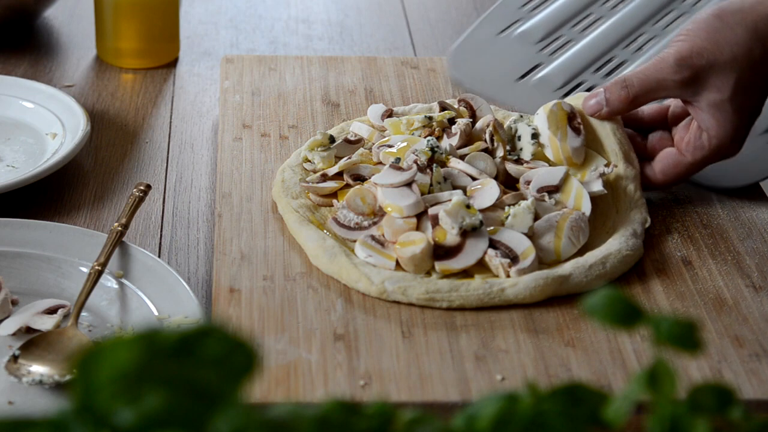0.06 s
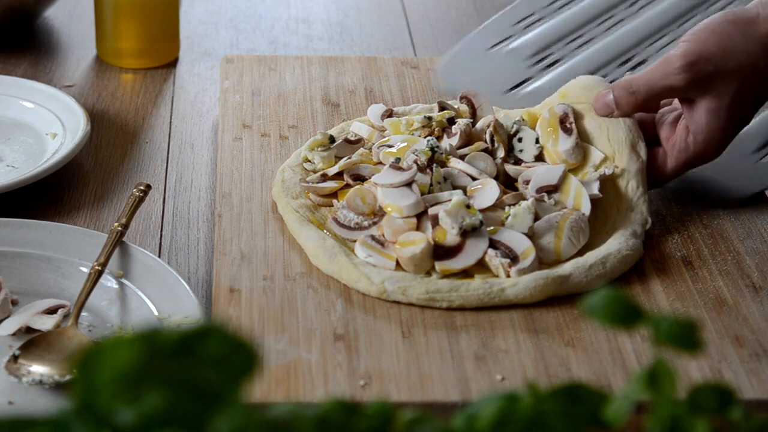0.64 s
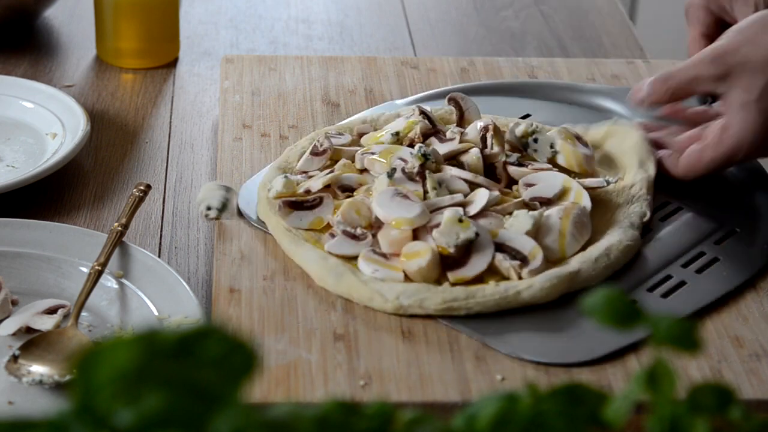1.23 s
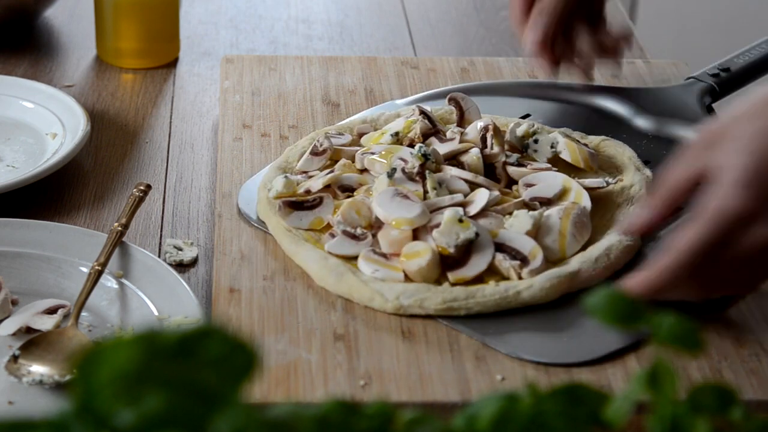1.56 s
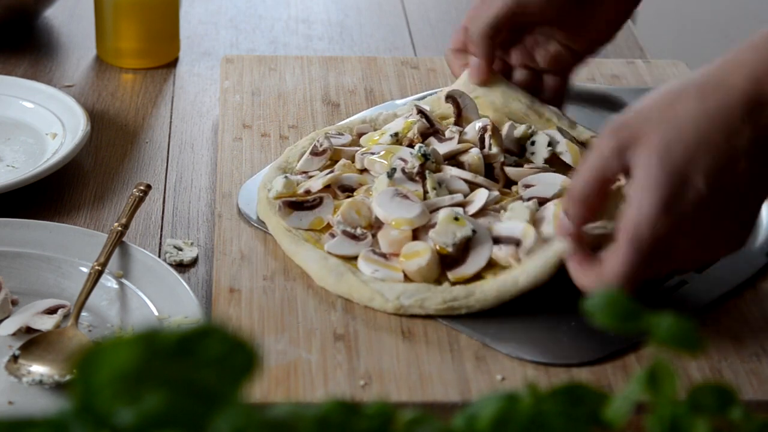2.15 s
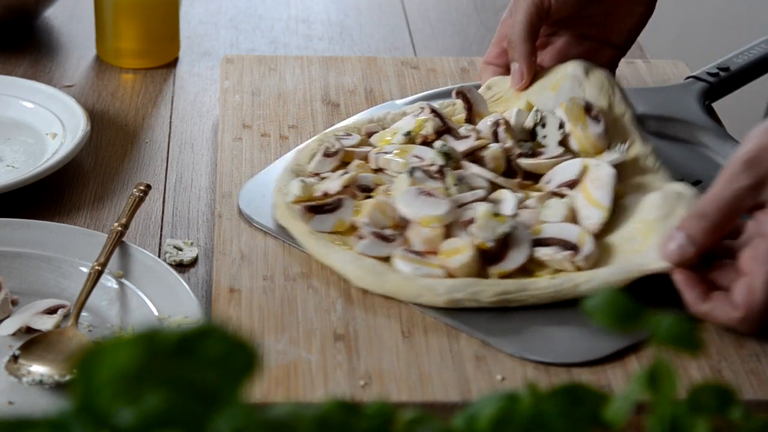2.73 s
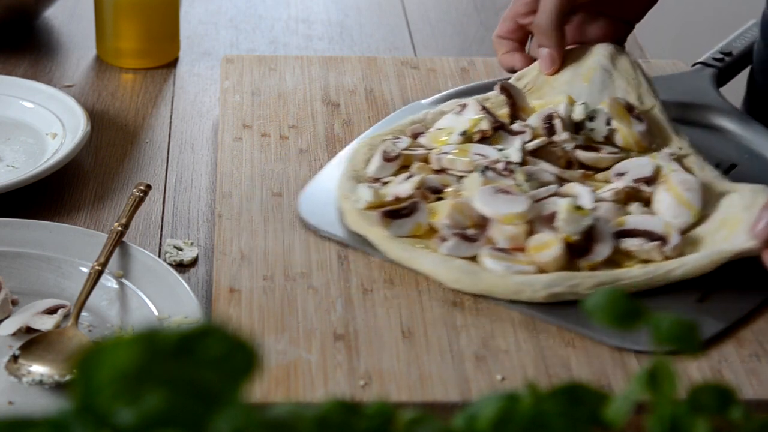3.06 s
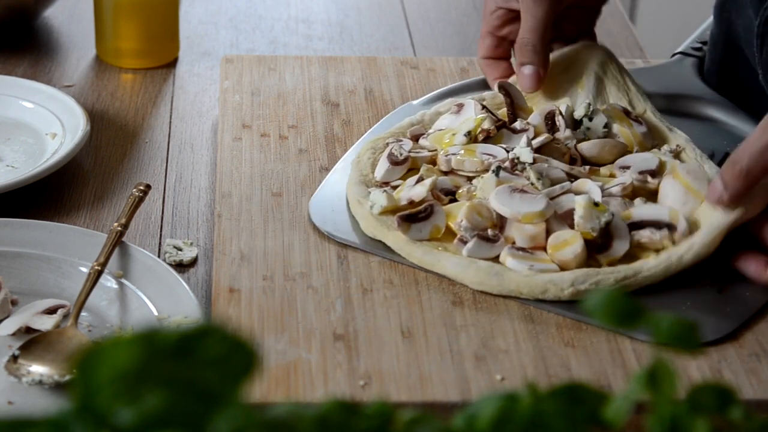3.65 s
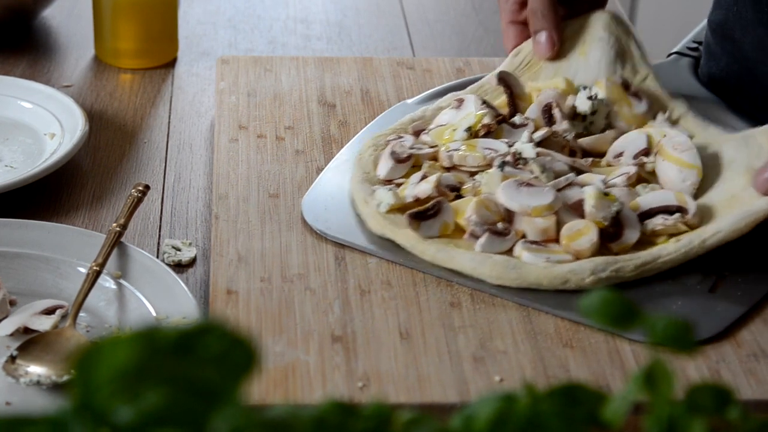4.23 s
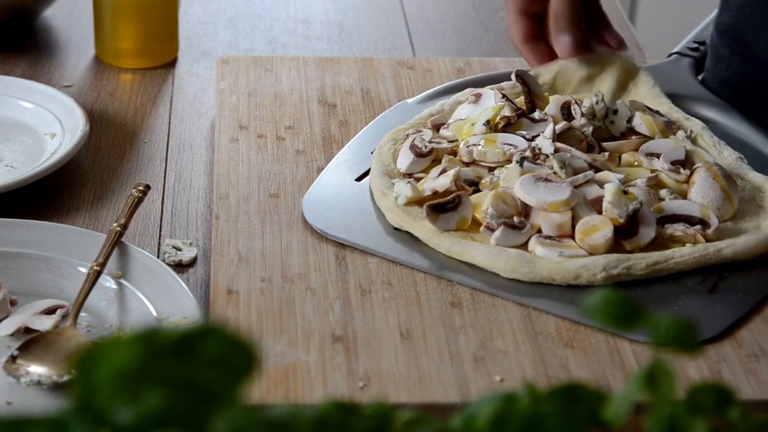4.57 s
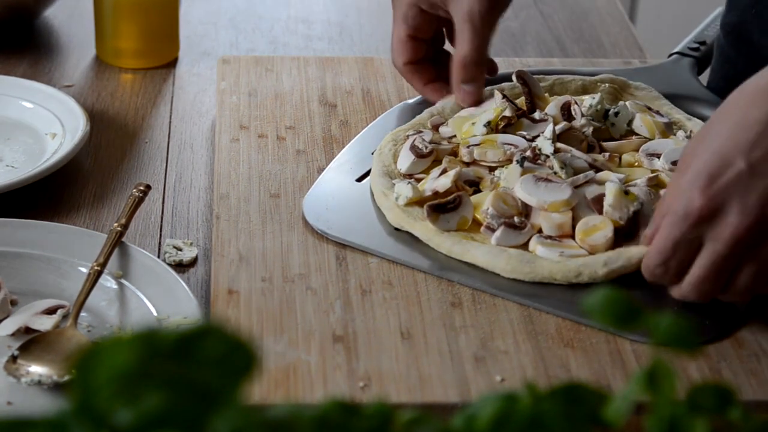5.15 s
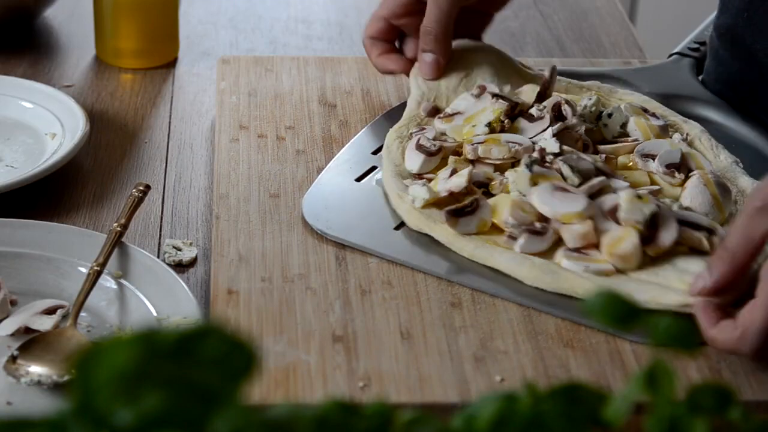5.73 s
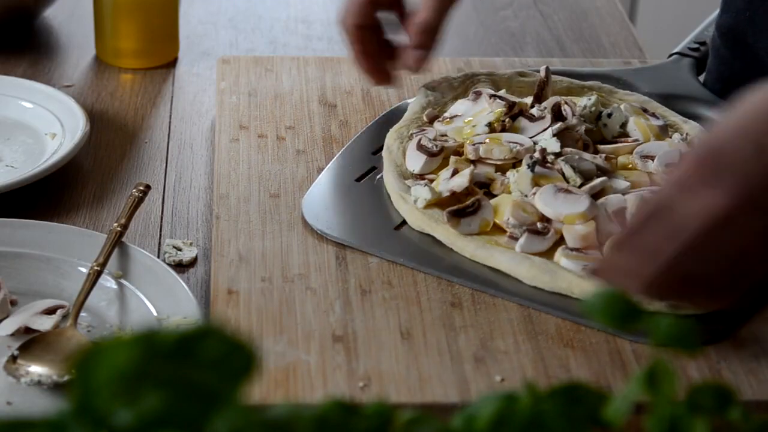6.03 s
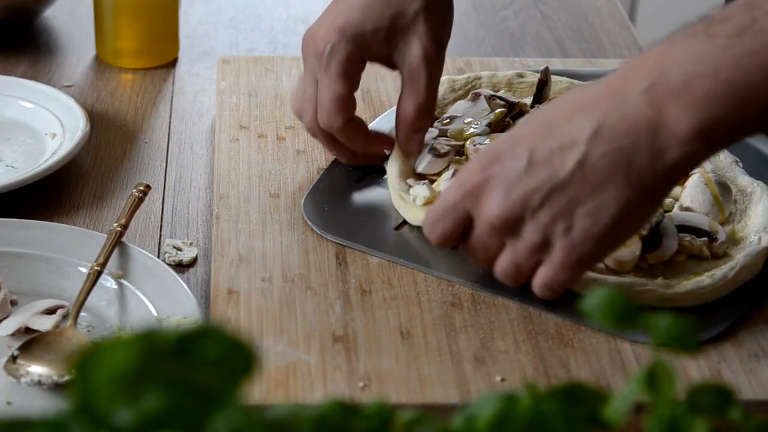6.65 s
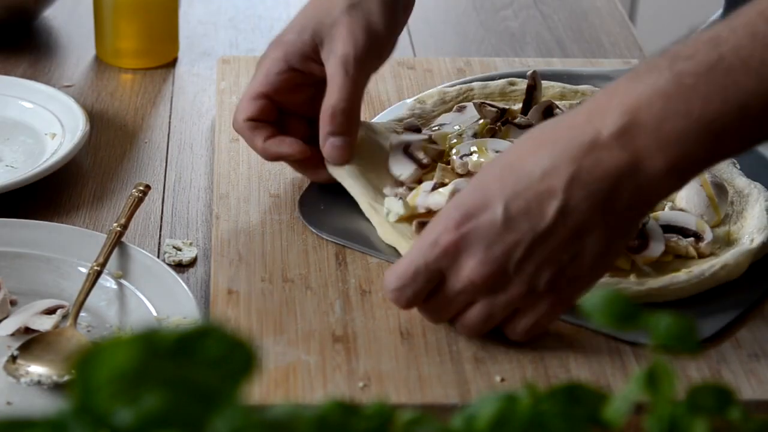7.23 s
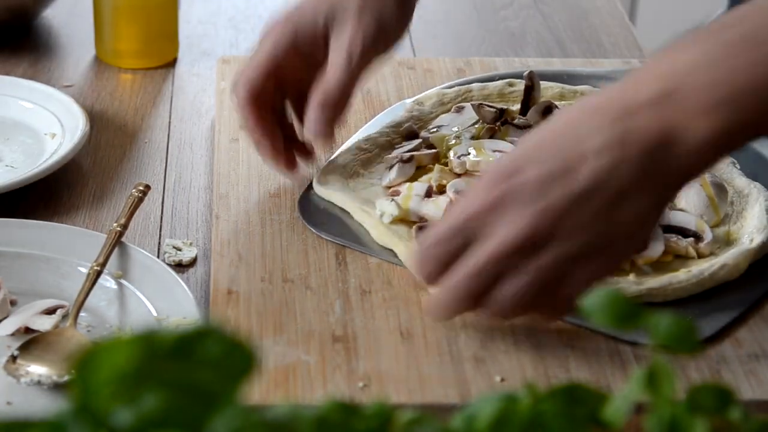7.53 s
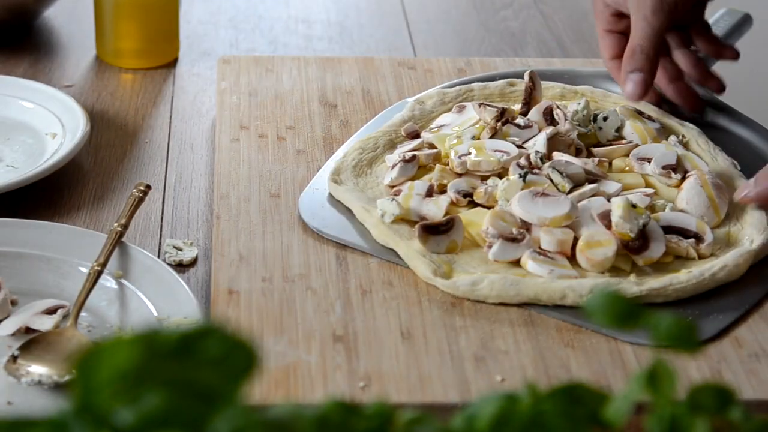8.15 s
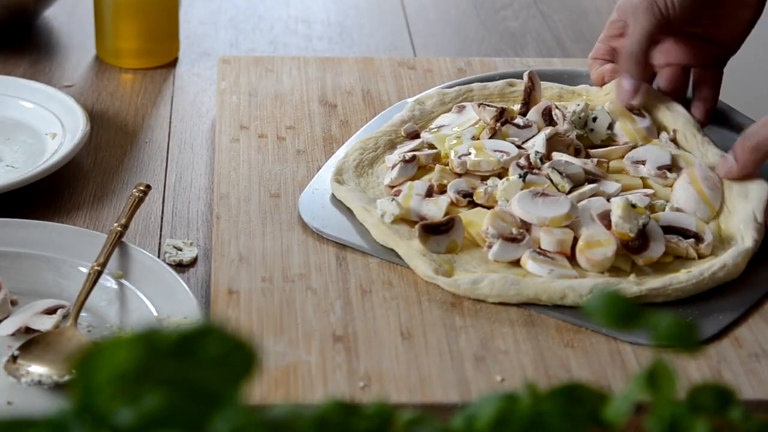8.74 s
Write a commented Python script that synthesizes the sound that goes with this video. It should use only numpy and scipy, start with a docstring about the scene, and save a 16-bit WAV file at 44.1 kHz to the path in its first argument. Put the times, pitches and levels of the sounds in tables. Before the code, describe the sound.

A metal pizza peel rasps over a wooden board in several short pushes. At about 0.9 seconds comes a louder, brighter shove that rings and falls in pitch as it slows. At 1.2 seconds the peel drops flat with a low thud and a clack, the strongest impact. Faint sticky ticks and soft finger bumps follow. From about 2.8 to 3.6 seconds dough drags on the metal with a soft floury hiss, a faint hollow note and several dull thumps. At 4 seconds there is a firm knock with a clatter and a short scuff. The rest is quieter: light clacks and rubs around 4.6, soft thumps near 5.1, 6.7 and 7.5, a brief rub at 7.1, small metallic clacks at 8 and soft bumps around 8.7 seconds. Everything is close and almost mono, in a small, quiet kitchen with a faint steady hiss.

```python
"""Pizza peel on a wooden board

A perforated metal peel scrapes over the board in short pushes, is shoved under the dough and drops flat.
Hands tug the pizza into shape: dough drags on the metal and ticks, the peel clacks on the board,
fingers thump the table softly. Small, quiet kitchen; close, almost mono."""
import sys
import numpy as np
from scipy import signal
from scipy.fft import rfft, irfft, next_fast_len
from scipy.io import wavfile
from scipy.ndimage import uniform_filter1d

SR = 44100
rng = np.random.default_rng(int(sys.argv[2]) if len(sys.argv) > 2 else 0)


def dump_mix(stems):
    """Bounce the given channels to the path in sys.argv[1] as a 16-bit WAV at rate SR."""
    frames = np.atleast_2d(stems).T  # one column per channel
    limited = np.clip(frames, -1, 1)  # hard clip at full scale
    pcm = np.round(limited * 32767).astype(np.int16)
    wavfile.write(sys.argv[1], SR, pcm)


N = 396459
TIME = np.arange(N) / SR

# low modes of board and table: (frequency [Hz], t60 [s])
BOARD_MODES = [(124, 0.1), (211, 0.072), (338, 0.15)]


def scrape(tremble, rise_s=.025, glide_s=.04, glide_db=-35.5, bite_s=.008, sing_share=.33):
    """The peel's edge grates over wood in short pushes, then bites and sings in one shove."""
    # metal on wood: (frequency [Hz], density [dB])
    rasp_spectrum = [(180, -38.5), (300, -0.5), (342, -2), (517, -11.5), (581, -1), (808, -7.5),
                     (985, -6.5), (1090, -2), (1460, -6), (1940, -3), (2170, -7), (2560, -3.5),
                     (5950, -18.5), (7250, -17.5), (15500, -32.5)]
    # pushes under the dough: (time [s], hold [s], level [dB])
    pushes = [(-.02, 0.01, -31.5), (.04, .01, -37), (0.166, 0.047, -23), (.218, 0.0041, -28),
              (0.363, .035, -35), (.492, .045, -27.5), (.555, .03, -24.5), (.686, 0.078, -22),
              (.74, .09, -22)]
    # shove, narrowing as it slows: (time [s], level [dB], treble [dB], centre [Hz], narrowness [0-1])
    shove_curve = [(.872, -22, -7, 2450, .2), (.892, -12, -6, 2610, .35), (.925, -12.5, -7, 2485, .35),
                   (.96, -14.5, -11.5, 1500, .45), (.985, -15.5, -16.5, 1348, .8),
                   (1.039, -23.5, -16, 1500, 0.6), (1.15, -32.5, -31.5, 1550, .85)]
    force = peel(friction(slips_per_s=4500, spread_db=1.7, smooth=.8), ring=3, t60_s=.3)
    rasp = unit(cut(colour(force, rasp_spectrum), 480, "high", order=4))
    edge = colour(friction(slips_per_s=4000, spread_db=-.5, smooth=.48), rasp_spectrum)
    edge = unit(cut(edge, 4800, "high", order=3))

    moves = [(s, rise_s, hold_s, db) for s, hold_s, db in pushes]
    # light glide before each push catches
    moves += [(s - glide_s, rise_s, glide_s + hold_s, glide_db) for s, hold_s, _ in pushes]
    push = strokes(moves, fade_db_per_s=140.5)  # the sheet rings on
    motion = strokes(moves, fade_db_per_s=300.5)  # edge fizz stops with the motion
    sliding = push * cut(rasp, 4800, "low", order=3) + amp(-20) * motion ** .65 * edge
    sliding += amp(-24) * push ** .45 * tremble
    sliding = cut(sliding, 11800, "low", order=5)  # highest fizz rolled off above about 12 kHz

    times_s, *columns = np.transpose(shove_curve)
    shove_db, treble_db, centre_hz, narrow = [np.interp(TIME, times_s, c) for c in columns]
    bite = np.clip((TIME - times_s[0]) / bite_s + 1, 0, 1)
    shove = bite * amp(shove_db - 126.5 * np.maximum(TIME - times_s[-1], 0))
    broad, sharp = [unit(resonate(force, centre_hz, width_hz)) for width_hz in (2000, 800)]
    sing = unit(cut((1 - narrow) * broad + narrow * sharp, 690, "high", order=4))
    brightness = amp(treble_db + 6)
    mids = cut(cut(rasp, 650, "high"), 1900, "low")
    grate = mids * brightness ** -.25 - cut(rasp, 2300, "high") * brightness ** .5
    fizz = amp(treble_db - 5) * unit(cut(rasp, 6600, "high", order=4))
    return sliding + shove * (np.sqrt(1 - sing_share) * grate + np.sqrt(sing_share) * sing + fizz)


def thumps(soft_rise_s=.022, hard_db=-8.5, sway_hz=72, rock_hz=28):
    """Soft blows swell the board's modes with a dull pat; the table sways, rocks and rumbles."""
    # fingertips favour the high mode, dough the low: (time [s], level [dB], high minus low [dB])
    blows = [(0.446, -31, -23), (0.991, -26.5, 25), (1.165, -9.5, -9), (1.201, -21.5, -6), (1.334, -34, -4),
             (1.4, -45.5, 1), (1.522, -48, 3), (1.652, -37, 11), (1.682, -34, -9), (1.754, -48, 12),
             (2.06, -51, -6.5), (2.188, -44.5, 14), (2.255, -34.5, 5), (2.82, -38, 8.5), (2.869, -43, -8),
             (2.967, -24.5, -16), (3.184, -25, -6.5), (3.231, -23.5, -20), (3.339, -20, -8.5),
             (3.563, -21.5, -15.5), (3.821, -44, 11), (3.899, -41.5, -18), (3.996, -16.5, 8.5),
             (4.07, -33.5, 0), (4.149, -44, 6), (4.497, -39, -4), (4.53, -35, -13), (4.666, -37, -12.5),
             (4.745, -37, -19), (4.955, -39, 1.5), (5.029, -40, 10), (5.138, -26.5, 1.5), (5.292, -48, 15),
             (5.401, -43, 11), (5.851, -40, 13), (5.996, -40.5, 19), (6.038, -43, 6), (6.288, -34, 8),
             (6.335, -44, 1.5), (6.49, -53, 8), (6.547, -36, -5.5), (6.657, -30, 7), (6.816, -48.5, 12),
             (6.926, -46.5, 12), (7.182, -45.5, -7), (7.521, -26.5, 6.5), (7.611, -42.5, -4),
             (7.78, -59, 6), (7.971, -37, 15), (8.04, -38.5, -4), (8.104, -40.5, -5), (8.408, -36.5, 24),
             (8.53, -52.5, -3), (8.679, -28.5, 32), (8.777, -27.5, -29), (8.948, -40, -9)]
    out, t = np.zeros(N), np.arange(SR // 2) / SR
    for s, level_db, tilt_db in blows:
        rise_s = soft_rise_s / (1 + amp(level_db - hard_db))  # harder lands faster
        swell = np.sin(np.pi / 2 * np.minimum(t / rise_s, 1)) ** 2
        after_s = np.maximum(t - rise_s, 0)
        low_db, high_db = level_db - max(tilt_db, 0), level_db + min(tilt_db, 0)
        mean_db = (low_db + high_db) / 2
        middle_db = mean_db + 3 + .31 * (mean_db - hard_db)
        modes = np.zeros(len(t))
        for (hz, t60_s), db in zip(BOARD_MODES, (low_db, middle_db, high_db)):
            detuned_hz = hz * (1 + .015 * rng.standard_normal())
            modes += amp(db) * decay(after_s, t60_s) * np.sin(2 * np.pi * detuned_hz * t)
        sway = amp(low_db - 10) * decay(after_s, .11) * np.sin(2 * np.pi * sway_hz * t)
        rock = amp(level_db - 24) * decay(after_s, .14) * np.sin(2 * np.pi * rock_hz * t)
        rumble = unit(cut(rng.standard_normal(len(t)), 190, "low", order=3))
        rumble *= amp(low_db - 17) * decay(after_s, .58)
        pat = unit(cut(rng.standard_normal(len(t)), 520, "low", order=3))
        pat *= amp(high_db - 23) * decay(after_s, .25)
        add(out, s, swell * (modes + sway + rock + rumble + pat))
    return out


def clacks():
    """Metal hits wood; the less dough damps the sheet, the more it rattles and rings."""
    # contacts: (time [s], level [dB], low edge [Hz], high edge [Hz], freedom to ring [dB])
    contacts = [(1.164, -14.5, 600, 1750, -12), (1.184, -20.5, 100, 910, 0.5), (1.36, -42, 1260, 3180, -1),
                (1.387, -54, 1400, 3800, -6), (1.527, -54, 300, 900, -7), (3.402, -50.5, 1200, 3320, -4),
                (3.807, -46.5, 2107, 3106, 11.5), (3.997, -31.5, 393, 1940, -12),
                (4.021, -30.5, 400, 2400, -7), (4.0573, -26, 880, 1730, -22),
                (4.502, -40.5, 450, 1650, 1.5), (4.534, -62, 600, 1600, -3), (4.612, -51, 1200, 3270, -3),
                (4.639, -58, 1200, 6100, -7), (4.669, -41.5, 786, 2280, -9),
                (4.743, -55.5, 1130, 2090, -11), (5.135, -51, 398, 1070, -17), (5.848, -47, 896, 2620, 11),
                (5.989, -51.5, 990, 2610, -9), (6.027, -64, 700, 1750, 5), (6.657, -39, 600, 1430, -4),
                (7.519, -46.5, 630, 1000, -1), (7.973, -44, 552, 1630, 8.5), (8.043, -39, 546, 2410, 3),
                (8.675, -57.5, 400, 2550, 9)]
    out = np.zeros(N)
    for s, db, low_hz, high_hz, free_db in contacts:
        knock = blow(low_hz, high_hz, contact_s=.0015, crack_s=.002,
                     rattle_db=free_db - 14, rattle_t60_s=.16)
        add(out, s, amp(db) * peel(knock, ring=.37 * amp(free_db), t60_s=.2))
    return out


def drag(tremble, hold_share=.27, fade_db_per_s=171, build_s=.1, creep_db=-82.5, creep_hiss_db=-89.5):
    """Dough slides on metal with a floury hiss and shakes the board; it never lies quite still."""
    # tugs on the dough: (time [s], swell [s], drag [dB], hiss [dB])
    pulls = [(1.57, 0.066, -57, -66), (2.08, 0.15, -61.5, -68.5), (2.55, 0.23, -66.5, -71.5),
             (2.768, 0.23, -40.5, -61), (3.03, 0.16, -39, -57), (3.38, 0.078, -60.5, -70),
             (3.99, 0.019, -29.5, -53.5), (4.17, 0.19, -70.5, -66), (4.49, 0.011, -54, -64),
             (4.61, 0.047, -48.5, -55.5), (5.3, 0.14, -67.5, -70), (5.6, 0.23, -66.5, -67),
             (5.95, 0.062, -55.5, -74), (6.54, .1, -65, -71), (6.74, 0.056, -78, -72.5),
             (7.12, 0.045, -53, -58.5), (7.54, .05, -64, -73), (8.66, 0.1, -65.5, -73.5),
             (8.92, 0.017, -52, -82)]
    # dough on metal: (frequency [Hz], density [dB])
    dough_spectrum = [(290, -43), (500, -10.5), (679, -3), (1110, -10.5), (1230, 0.5), (1590, -0.5),
                      (1890, -4), (2130, -5.5), (4200, -19), (7440, -33.5), (12000, -54.5), (15600, -77),
                      (22000, -120)]
    # flour hiss: (frequency [Hz], density [dB])
    flour_spectrum = [(1500, -10), (3500, 6.5), (7400, 2), (9000, -7), (15000, -19.5)]
    times_s, swell_s, drag_db, hiss_db = np.transpose(pulls)
    slow_db = drag_db - 20 * np.log10(1 + (build_s / swell_s) ** 2)  # the note needs a slow pull
    pull, flour, slow = [strokes(zip(times_s, swell_s, hold_share * swell_s, db), fade_db_per_s)
                         for db in (drag_db, hiss_db, slow_db)]
    grip = friction(slips_per_s=2500, spread_db=1.2, smooth=1)
    rub = colour(peel(grip, ring=.56, t60_s=.47), dough_spectrum) + amp(-2) * tremble
    hiss = colour(friction(slips_per_s=2700, spread_db=1.5, smooth=1), flour_spectrum)
    note = amp(-38) * slow / slow.max() * hollow_note()
    return np.hypot(pull, amp(creep_db)) * rub + np.hypot(flour, amp(creep_hiss_db)) * hiss + note


def hollow_note():
    """Steady stick-slip feeds one board mode; pitch wanders, strength hardly does."""
    note = unit(resonate(rng.standard_normal(N), BOARD_MODES[2][0], width_hz=22))
    strength = np.sqrt(abs(uniform_filter1d(note ** 2, size=800)) + .2)
    return unit(note / strength)


def judder():
    """Friction shakes the board's low modes: one signal under metal, one under dough."""
    # board resonances: (frequency [Hz], width [Hz], under metal [dB], under dough [dB])
    resonances = [(86, 12, -12, -13.5), (124, 42, -2.5, -3), (204, 50, -14.5, -6), (348, 43, 1.5, -10),
                  (417, 45, -7.5, -2)]
    noise = rng.standard_normal(N)
    trembles = sum(amp(levels_db)[:, None] * unit(resonate(noise, hz, width_hz))
                   for hz, width_hz, *levels_db in resonances)
    return [unit(tremble) for tremble in trembles]


def scuffs(t60_s=.24, fuzz_db=-27):
    """Hands, dough and peel rub briefly and dully."""
    # rubs: (time [s], swell [s], level [dB], low edge [Hz], high edge [Hz])
    rubs = [(3.592, 0.042, -44, 420, 870), (3.998, 0.027, -28, 496, 1340), (4.58, 0.1, -43.5, 1210, 1433),
            (4.904, 0.042, -49, 384, 950), (6.025, 0.017, -47.5, 610, 1210),
            (6.66, 0.015, -44.5, 400, 1360), (7.132, 0.022, -34, 414, 880), (7.16, 0.019, -44.5, 503, 1760),
            (7.55, 0.017, -57.5, 500, 950), (7.76, 0.029, -52.5, 360, 730), (8.05, 0.053, -47, 527, 1710),
            (8.296, 0.042, -51, 1160, 1700), (8.553, 0.036, -54.5, 324, 646), (8.925, 0.015, -41, 505, 926)]
    out, t = np.zeros(N), np.arange(SR // 2) / SR
    for s, swell_s, db, low_hz, high_hz in rubs:
        noise = rng.standard_normal(len(t))
        band = signal.butter(3, [low_hz, high_hz], "band", fs=SR, output="sos")
        rub = unit(signal.sosfilt(band, noise)) + amp(fuzz_db) * unit(cut(noise, 2500, "low"))
        envelope = np.minimum(t / swell_s, 1) * decay(np.maximum(t - swell_s, 0), t60_s)
        add(out, s, amp(db) * envelope * rub)
    return out


def ticks(faint_count=14):
    """Sticky dough and toppings snap under the fingers: a few clear ticks, faint ones at random."""
    # clear snaps: (time [s], level [dB])
    snaps = [(1.579, -63.5), (1.641, -62), (1.682, -53), (1.751, -58), (2.059, -68), (2.946, -49),
             (4.945, -67), (6.282, -64), (6.922, -66.5), (8.677, -61)]
    faint = [(rng.uniform(snaps[0][0], TIME[-1]), rng.uniform(-76, -70)) for _ in range(faint_count)]
    out = np.zeros(N)
    for s, db in snaps + faint:
        snap = blow(1500, 6150, contact_s=.00042, crack_s=.0024, rattle_db=-16, rattle_t60_s=.13)
        add(out, s, amp(db) * snap)
    return out


def kitchen(x, delay_s=.011):
    """Diffuse tail of a small room, longest in the mids."""
    # room decay: (frequency [Hz], t60 [s])
    decay_times = [(100, 0.06), (400, 0.28), (1800, 0.25), (5000, 0.16), (12000, 0.2)]
    hz, t, bins = signal.stft(rng.standard_normal(SR * 3 // 5), SR, nperseg=256)
    tail = signal.istft(bins * decay(t, interp_log(decay_times, hz)[:, None]), SR, nperseg=256)[1]
    tail = np.r_[np.zeros(round(delay_s * SR)), tail]
    return signal.oaconvolve(x, tail / np.linalg.norm(tail))[:N]


def room_tone():
    """Steady dark hiss."""
    # room air: (frequency [Hz], density [dB])
    air_spectrum = [(25, -8), (60, -9), (125, -2), (250, -5), (500, -7.5), (1500, -8.5), (2100, -13.5),
                    (3200, -18), (4200, -23.5), (6300, -30), (10000, -32.5), (15500, -34)]
    return colour(rng.standard_normal(N), air_spectrum)


def peel(force, ring, t60_s):
    """Force through the metal sheet: narrow modes over a broad response."""
    # sheet modes: (frequency [Hz], level [dB])
    sheet_modes = [(675, -2), (883, 3.5), (997, 1.5), (1270, -2), (1497, 3.5), (1604, -0.5), (1884, -3),
                   (1954, -5.5), (2304, -8.5), (2331, -3.5), (2502, -3), (2557, -3.5), (2659, -8),
                   (2745, -5.5), (2869, 0.5), (3110, -1), (3246, -6), (3354, -7.5), (3521, -4.5), (4221, 3),
                   (4400, -9), (7040, 1)]
    t = np.arange(SR // 3) / SR
    modes = sum(amp(db) * np.cos(2 * np.pi * hz * t) for hz, db in sheet_modes)
    fade = decay(t, t60_s)
    return force + ring * signal.oaconvolve(force, 2 * modes * fade / fade.sum())[:len(force)]


def friction(slips_per_s, spread_db, smooth):
    """Tiny uneven slips over a smooth hiss."""
    sizes = amp(spread_db * np.minimum(rng.exponential(1, N), 4)) * rng.standard_normal(N)
    slips = unit(sizes * (rng.random(N) < slips_per_s / SR))
    return unit(slips + smooth * rng.standard_normal(N))


def blow(low_hz, high_hz, contact_s, crack_s, rattle_db, rattle_t60_s):
    """Brief crack, then dense rattle; rms 1 over the first 10 ms."""
    t = np.arange(SR // 4) / SR
    attack = 1 - np.exp(-t / contact_s)
    fade = np.exp(-t / crack_s) + amp(rattle_db) * decay(t, rattle_t60_s)
    force = cut(rng.choice([-1, 1], len(t)) * attack * fade, low_hz, "high", order=3)
    sound = cut(force, high_hz, "low", order=4) + amp(-10) * cut(force, high_hz, "low")
    return sound / np.sqrt(np.mean(sound[:SR // 100] ** 2))


def strokes(rows, fade_db_per_s):
    """Envelope of strokes summed in power; rows: (time [s], swell [s], hold [s], level [dB])."""
    power = np.zeros(N)
    for s, swell_s, hold_s, db in rows:
        t = np.arange(5 * SR // 4) / SR - min(s, 0)
        gain = amp(db - fade_db_per_s * np.maximum(t - swell_s - hold_s, 0))
        add(power, s, np.minimum(t / swell_s, 1) ** 3 * gain ** 2)
    return np.sqrt(power)


def resonate(x, hz, width_hz):
    """Double-pole resonance, gain 1; hz may be a curve."""
    carrier = np.exp(2j * np.pi * np.cumsum(hz * np.ones(len(x))) / SR)
    pole = np.exp(-np.pi * width_hz / SR)
    baseband = signal.lfilter([(1 - pole) ** 2], [1, -2 * pole, pole * pole], x / carrier)
    return 2 * (carrier * baseband).real


def colour(x, spectrum):
    """Spectral shaping to rms 1."""
    size = next_fast_len(N)
    gain = amp(interp_log(spectrum, np.fft.rfftfreq(size, 1 / SR)))
    return unit(irfft(rfft(x, size) * gain, size)[:N])


def interp_log(points, hz):
    """Table lookup on a log-frequency axis."""
    points_hz, values = np.transpose(points)
    return np.interp(np.log(hz + 1), np.log(points_hz + 1), values)


def cut(x, hz, kind, order=2):
    """Causal low-pass or high-pass."""
    return signal.sosfilt(signal.butter(order, hz, kind, fs=SR, output="sos"), x)


def add(mix, start_s, sound):
    """Mix in place."""
    part = mix[max(round(start_s * SR), 0):][:len(sound)]
    part += sound[:len(part)]


def decay(t, t60_s):
    """Gain falling 60 dB per t60_s."""
    return amp(-60 * t / t60_s)


def amp(db):
    """dB to gain."""
    return 10 ** (np.asarray(db) / 20)


def unit(x):
    """Scale to rms 1."""
    return x / np.sqrt(np.mean(x ** 2) + 1e-20)


def scene():
    """One room; handling a hair to the right, scrape nearer the middle."""
    under_metal, under_dough = judder()
    rasp, dough = scrape(under_metal), drag(under_dough)
    thump, clack, tick, scuff = thumps(), clacks(), ticks(), scuffs()
    reverb = kitchen(amp(-18.5) * (rasp + dough) + amp(-12) * thump + amp(-4.5) * clack
                     + amp(-6.5) * tick + amp(-20) * scuff)
    handling = dough + thump + clack + tick + scuff + reverb + amp(-64) * room_tone()
    side = amp(-72.5) * room_tone() - amp(-35) * cut(handling + amp(-13) * rasp, 2500, "low")
    return np.array([rasp + handling + side, rasp + handling - side])


def record(dry, edge_hz=15750):
    """Clip at full scale, then band-limit."""
    lowpass = signal.firwin(511, edge_hz, window=("kaiser", 9), fs=SR)
    return signal.oaconvolve(np.clip(dry, -1, 1), lowpass[None], "same")


dry = scene()
out = record(dry)
dump_mix(out)
```